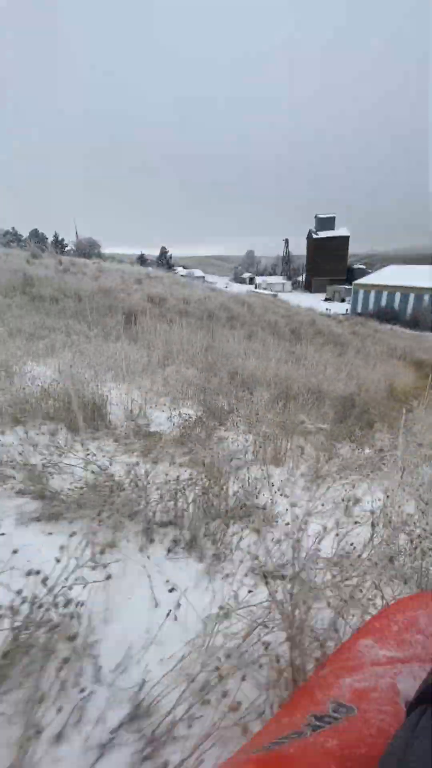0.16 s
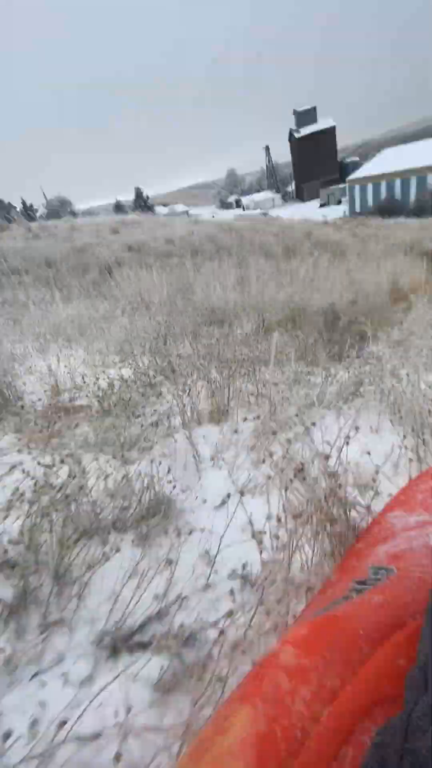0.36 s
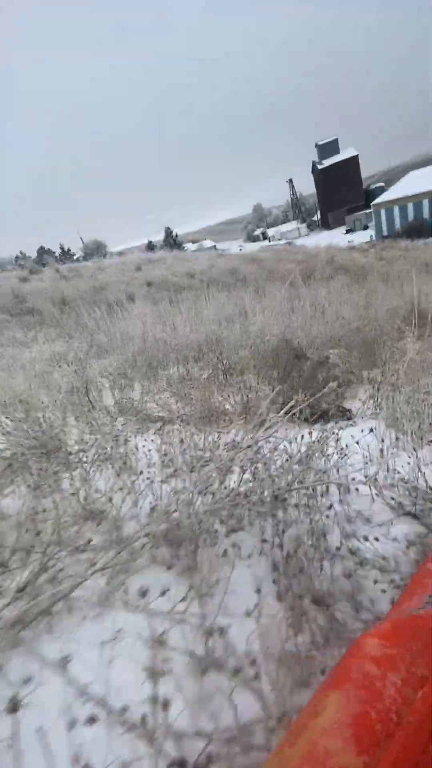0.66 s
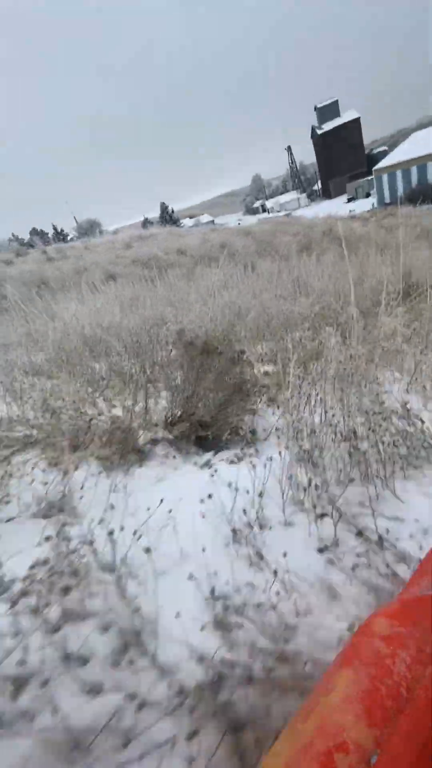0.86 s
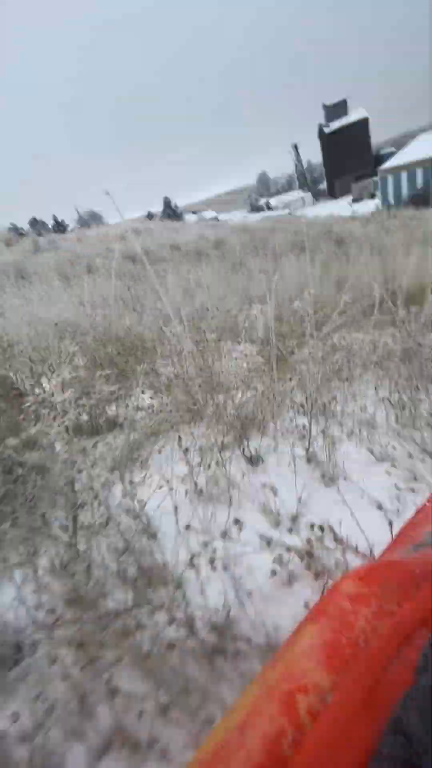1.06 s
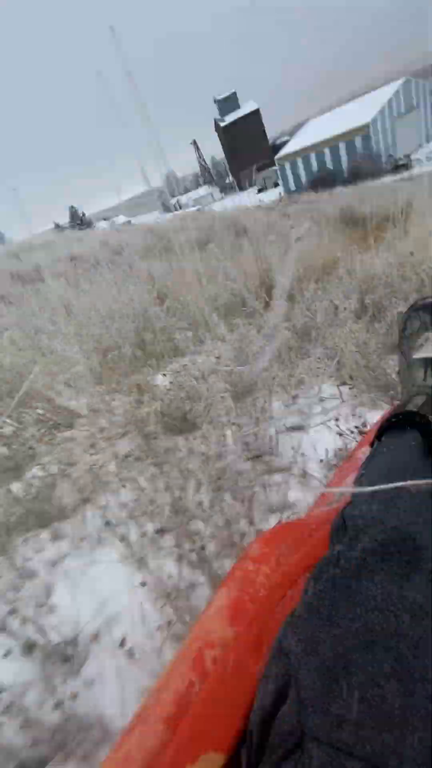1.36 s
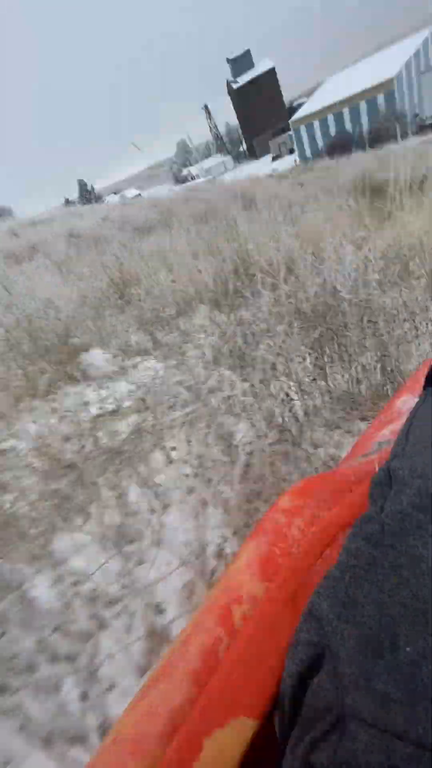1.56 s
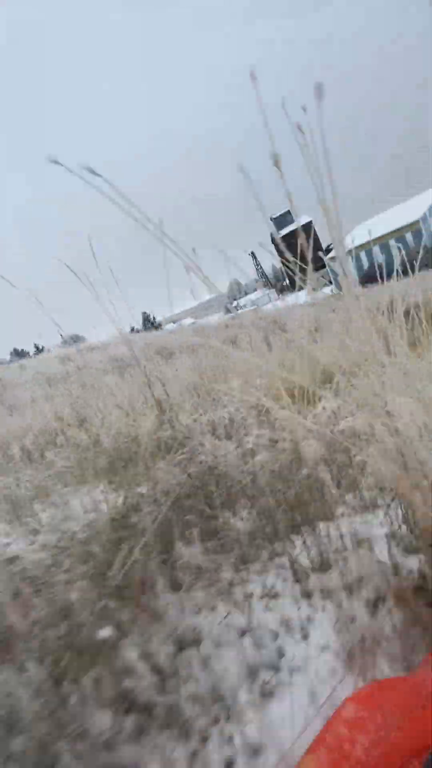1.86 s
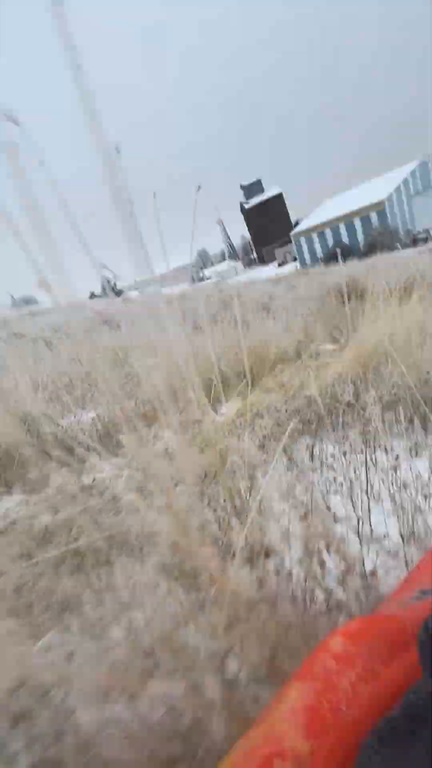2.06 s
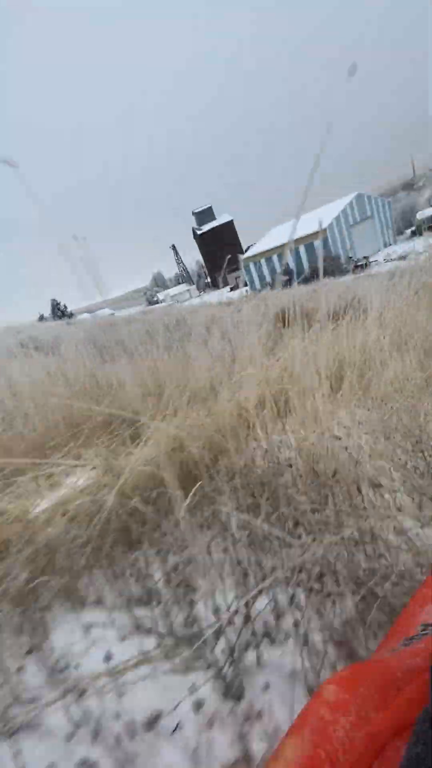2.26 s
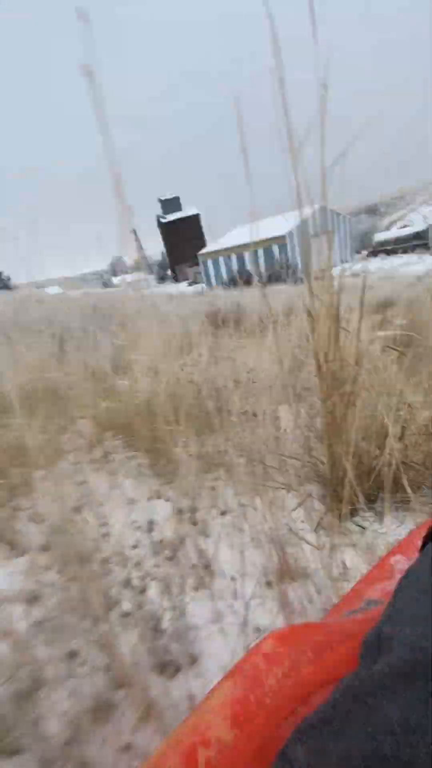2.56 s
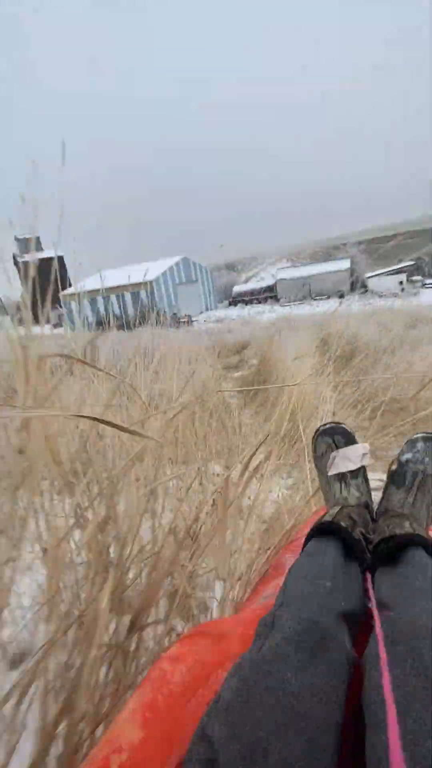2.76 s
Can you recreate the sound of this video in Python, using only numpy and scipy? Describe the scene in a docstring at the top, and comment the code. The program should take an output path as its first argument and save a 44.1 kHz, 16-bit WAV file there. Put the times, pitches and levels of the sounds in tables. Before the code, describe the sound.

From a near-silent instant, a hollow plastic hull bumps into a fast, uneven slide over crusty snow; scraping, rattling and crackling stems continue under rumbling wind, with fewer booms at the end. Close, open-air, on-board microphone.

```python
"""Snow grinds and drums under the hull of a plastic kayak sliding fast down a hillside, heard from on board.
Bursts of random fractures make the crunches on crusty tufts; decaying sines make the boom of each bump.
Ringing shell modes and brief noise bands make the knocks and scrapes; dry grass is filtered grain noise.
Wavering low noise is the wind at two microphone ports, which eases as the boat slows in tall grass near
the end."""
import sys
import numpy as np
from scipy import signal
from scipy.fft import rfft, irfft, next_fast_len
from scipy.io import wavfile

SR = 44100
rng = np.random.default_rng(int(sys.argv[2]) if len(sys.argv) > 2 else 0)


def dump_mix(stems):
    """Bounce the given channels to the path in sys.argv[1] as a 16-bit WAV at rate SR."""
    frames = np.atleast_2d(stems).T  # one column per channel
    limited = np.clip(frames, -1, 1)  # hard clip at full scale
    pcm = np.round(limited * 32767).astype(np.int16)
    wavfile.write(sys.argv[1], SR, pcm)


N = 127890  # samples, 2.9 s
T = np.arange(N) / SR


def amp(db):
    """Logarithmic level: decibels to a pressure ratio."""
    return 10 ** (np.asarray(db) / 20)


def level(curve):
    """Envelope: gain over time, interpolated in decibels between (time [s], level [dB]) points."""
    return amp(np.interp(T, *np.transpose(curve)))


def unit(x):
    """Normalization to an rms of 1."""
    return x / np.sqrt(np.mean(x ** 2) + 1e-20)


def add(mix, start_s, sound):
    """Superposition: mixes a two-channel sound in from its start time."""
    part = mix[:, round(start_s * SR):][:, :sound.shape[1]]
    part += sound[:, :part.shape[1]]


def flutter(rate_hz, depth_db):
    """Random amplitude modulation: a gain that wavers mostly below the given rate, by depth_db rms."""
    hz = np.fft.rfftfreq(N, 1 / SR)
    slow_band = hz / (hz + rate_hz / 10) / (1 + (hz / rate_hz) ** 2)
    slow = irfft(rfft(rng.standard_normal(N)) * slow_band, N)
    return unit(amp(depth_db * unit(slow)))


def grains(per_s, spread_db, smooth):
    """Granular friction: two trains of tiny fractures of uneven size, over a share of smooth rubbing."""
    size = amp(spread_db * np.minimum(rng.exponential(1, N), 4))
    happens = rng.random(N) < per_s / SR  # both trains share their instants
    clicks = size * happens * rng.standard_normal((2, N))
    return unit(unit(clicks) + smooth * rng.standard_normal((2, N)))


def patchy(x, depth_db, width_hz, length_s):
    """Moving excitation: random short-lived resonances, as the point of contact wanders over the shell."""
    frames = dict(nperseg=1024, noverlap=768)
    hz, t, spectrum = signal.stft(x, SR, **frames)
    along_hz = np.fft.fftfreq(len(hz), hz[1])[:, None]
    along_s = np.fft.fftfreq(len(t), t[1])
    blur = np.exp(-(along_hz * width_hz) ** 2 - (along_s * length_s) ** 2)
    noise = rng.standard_normal(spectrum.shape[1:])
    field = unit(np.fft.ifft2(np.fft.fft2(noise) * blur).real)
    return unit(signal.istft(spectrum * amp(depth_db * field), SR, **frames)[1][:, :N])


# phase lead of the left port: (frequency [Hz], lead [-1 to 1])
PORT_LEAD = [(30, 0.47), (100, 1), (170, 0.72), (260, -0.38), (430, -0.71), (700, -1), (1100, 0.36),
             (1900, 0.22), (2600, -0.59), (3700, 0.57), (4650, 0.33), (5400, 0.77), (7000, .3), (12000, 0)]


def ports(drive, colour):
    """Partial coherence: two drives are coloured into the common and opposed parts of two close ports."""
    size = next_fast_len(N + SR // 2)
    log_hz = np.log(np.fft.rfftfreq(size, 1 / SR) + 1)
    hz, common_db, opposed_db = np.transpose(colour)
    common = amp(np.interp(log_hz, np.log(hz), common_db))
    opposed = amp(np.interp(log_hz, np.log(hz), opposed_db))
    lead_hz, lead = np.transpose(PORT_LEAD)
    lead = np.clip(np.interp(log_hz, np.log(lead_hz), lead), -1, 1)
    a, b = rfft(drive, size)
    mid = common * a
    side = opposed * (1j * lead * a + np.sqrt(1 - lead ** 2) * b)  # 1j: a quarter cycle ahead
    both = irfft(np.array([mid + side, mid - side]), size)[:, :N]
    return both / np.sqrt(np.mean(common ** 2 + opposed ** 2))


def pair(z, opposed_db):
    """Phase difference: a complex vibration at two ports, further out of phase for a stronger opposed part."""
    return (z * np.exp(1j * np.arctan(amp(opposed_db)) * np.array([[1], [-1]]))).real


# relative level of the grinding on snow: (time [s], level [dB])
GRIND_LEVEL = [(0, -41), (.095, -38), (.125, -35), (.3, -26), (.365, -34), (.42, -26), (.55, -31),
               (.72, -24.5), (.82, -29.5), (1.0, -25.5), (1.22, -28), (1.37, -25.5), (1.5, -23),
               (1.7, -28.5), (1.81, -33.5), (1.9, -24), (2.04, -30), (2.15, -27), (2.285, -33),
               (2.35, -25.5), (2.6, -26.5), (2.71, -26.5), (2.78, -21), (2.9, -25)]
# spectrum of the grinding: (frequency [Hz], relative common level [dB], relative opposed level [dB])
GRIND_SPECTRUM = [(149, -48, -26), (395, -2, -2), (666, -25.5, -2), (884, -4.5, 5.5), (994, -12.5, 2.5),
                  (1384, -4.5, 3), (1920, -1.5, 3), (2450, -10.5, 0), (3440, -12.5, -1),
                  (4180, -14.5, -14.5), (6800, -34, -18), (12000, -57, -59)]
# relative level of the drumming of the hull: (time [s], level [dB])
DRUM_LEVEL = [(0, -41.5), (.09, -26.5), (.15, -18), (.31, -21), (.37, -40), (.44, -31), (.54, -21),
              (.82, -24.5), (1.08, -26), (1.35, -21.5), (1.4, -28), (1.45, -21.5), (1.8, -23),
              (1.95, -19.5), (2.04, -34), (2.12, -19), (2.29, -34.5), (2.38, -21), (2.5, -32), (2.63, -38),
              (2.77, -28), (2.9, -30.5)]
# spectrum of the hull: (frequency [Hz], relative common level [dB], relative opposed level [dB])
HULL_SPECTRUM = [(50, -68, -28), (113, -8, 0.5), (163, -5, 0), (240, -6, 0.5), (290.7, -1.5, 4),
                 (335, -10.5, -4), (387, -7.5, -5), (438, -8, -18), (520, -23, -14), (630, -32, -4.5),
                 (780, -24, -14), (970, -56, -9.5), (3000, -87, -79)]
GRIND_DB, DRUM_DB = -1.7, -1.5


def sliding():
    """Friction noise: snow grains grind and small lumps drum, both with the wavering contact pressure."""
    pressure = flutter(rate_hz=45, depth_db=0.65)
    snow = patchy(grains(per_s=4000, spread_db=1.0, smooth=0.86), depth_db=4.5, width_hz=76, length_s=0.077)
    lumps = patchy(grains(per_s=500, spread_db=3.5, smooth=0.76), depth_db=2.5, width_hz=220, length_s=0.057)
    grind = ports(snow * pressure * level(GRIND_LEVEL), GRIND_SPECTRUM)
    drum = ports(lumps * pressure * level(DRUM_LEVEL), HULL_SPECTRUM)
    return amp(GRIND_DB) * grind + amp(DRUM_DB) * drum


# crunches on tufts and crust, levels relative: (time of the peak [s], rise [s], fall [s],
# hull knock level [dB], crunch level [dB], stem snap level [dB])
CRUNCH_EVENTS = [ (.122, 0.006, 0.023, -7, -16, -44), (0.12, 0.0018, 0.0037, -20, -33, -18.5),
                 (0.155, 0.0069, 0.0062, -21, -19, -40), (.249, 0.0072, 0.018, -16.5, -16.5, -33),
                 (0.269, .0086, 0.019, -26, -14, -33.5), (0.41, 0.0043, 0.012, -6, -29, -22.5),
                 (0.42, .0027, 0.0094, -13, -31, -29), (0.5, 0.0026, 0.0084, -32, -20, -49),
                 (.656, .0048, 0.006, -25.5, -33, -35), (0.781, 0.015, 0.006, -13, -28, -38),
                 (0.882, .0084, 0.0095, -14.5, -19, -29.5), (1.005, 0.014, 0.026, -9, -20.5, -36),
                 (1.137, 0.0072, 0.016, -12, -22.5, -25.5), (1.243, 0.03, 0.028, -14, -16, -33.5),
                 (1.26, 0.004, 0.01, -12, -15.5, -27.5), (1.280, 0.0087, 0.011, -11, -30, -46),
                 (1.33, 0.0031, 0.01, -10, -26, -47), (1.454, 0.013, 0.012, -20.5, -20, -31),
                 (1.521, .0086, .019, -17, -24, -50), (1.721, 0.0021, .013, -13, -19, -27),
                 (1.747, 0.0013, 0.021, -14, -15, -47), (1.863, 0.026, 0.017, -16, -21, -31.5),
                 (1.887, .008, 0.0092, -11, -14, -36), (1.909, .0016, 0.005, -17.5, -36, -26),
                 (1.998, 0.006, 0.0044, -14, -33, -33), (2.124, 0.0021, 0.011, -11.5, -29, -40),
                 (2.242, 0.0058, 0.0093, -6, -20, -36.5), (2.331, 0.0037, 0.0058, -9, -15, -23),
                 (2.348, 0.0042, 0.013, -11.5, -35, -47), (2.662, .004, .0046, -24, -34, -27),
                 (2.741, 0.01, 0.0064, -16, -21, -45), (2.801, .0039, 0.0078, -21.5, -20, -25)]
# spectrum of breaking crust: (frequency [Hz], relative common level [dB], relative opposed level [dB])
CRUST_SPECTRUM = [(150, -44, -27), (450, -17, 2), (600, -21, 2), (720, -22, -0.5), (860, -16, 7),
                  (960, -37, 6), (1070, -9, -2), (1190, -6.5, 5), (1450, -13, -3), (1600, -13.5, -5),
                  (2000, -12, 0), (2680, -16, -9), (3130, -33, -22), (4460, -45, -33), (7000, -60, -42),
                  (12000, -81, -70)]
# spectrum of snapping stems: (frequency [Hz], relative common level [dB], relative opposed level [dB])
SNAP_SPECTRUM = [(500, -18, -28), (1540, -8, -13), (2550, -1.5, 6), (3740, 3, 11.5), (4300, 1.5, -4),
                 (4500, -2, 0.5), (5920, -0.5, -8), (6260, -19, -5), (7440, -12.5, -8), (9500, -21.5, -49),
                 (12000, -55, -41)]
CRUNCH_DB = 2.5


def crunches():
    """Brittle fracture: each tuft is a burst of fractures; the shell knocks, the crust crunches, stems snap."""
    power = np.zeros((3, N))
    for peak_s, rise_s, fall_s, *parts_db in CRUNCH_EVENTS:
        distance = np.maximum((peak_s - T) / rise_s, (T - peak_s) / fall_s)
        shape = np.exp(-distance.clip(0, 20))
        power += (amp(parts_db)[:, None] * shape) ** 2  # independent bursts add in power
    out = np.zeros((2, N))
    for part, colour in zip(power, (HULL_SPECTRUM, CRUST_SPECTRUM, SNAP_SPECTRUM)):
        breaks = grains(per_s=1500, spread_db=0.5, smooth=0.65)
        fractures = patchy(breaks, depth_db=4.0, width_hz=315, length_s=0.11)
        out += ports(fractures * np.sqrt(part), colour)
    return amp(CRUNCH_DB) * out


# flexing of the hull bottom at each bump: (time [s], relative level [dB], pitch [Hz], decay [s])
BUMP_EVENTS = [ (0.113, -8, 91.9, 0.053), (0.149, -9.5, 77.5, 0.022), (0.401, -8, 57.4, 0.05),
               (0.554, -11, 67, 0.024), (.776, -7, 87.7, 0.017), (0.894, -17, 63, 0.047),
               (1.001, -9, 90, 0.05), (1.081, -12, 53, 0.041), (1.137, -13, 92.8, 0.079),
               (1.281, -7.5, 87, 0.038), (1.34, -2, 67, 0.014), (1.673, -5.5, 54, 0.018),
               (1.728, -1, 103.2, 0.032), (1.847, -9.5, 69.6, 0.064), (1.974, -12.5, 60.3, 0.035),
               (2.056, -4, 71.6, 0.015), (2.132, -10, 86.4, 0.021), (2.248, -6.5, 78, 0.012),
               (2.308, -10, 58.7, 0.019), (2.345, -12, 66, 0.022), (2.676, -18, 69.5, 0.022)]
BOOM_DB, BOOM_RISE_S, BOOM_PORT_LAG_S = 4.5, 0.0066, 0.0036


def booms():
    """Damped oscillation: the hull bottom swings briefly after each bump; the left port hears it first."""
    out = np.zeros((2, N))
    port_lag = np.array([[0], [BOOM_PORT_LAG_S]])
    for start_s, db, hz, decay_s in BUMP_EVENTS:
        t = np.maximum(T - start_s - port_lag, 0)
        shape = (1 - np.exp(-t / BOOM_RISE_S)) * np.exp(-t / decay_s)
        out += amp(db) * shape * np.sin(2 * np.pi * hz * t)
    return amp(BOOM_DB) * out


# hard knocks on the plastic shell: (time [s], relative level [dB],
# pitch factor of the spot that is hit [ratio], opposed over common [dB])
KNOCK_EVENTS = [(0.263, -17, 0.7, 14), (1.26, -15.5, 1.12, 8.5), (1.717, -13.5, 0.98, 4),
                (1.868, -17, 0.84, 15), (2.31, -18, 0.603, 6), (2.738, -18, 0.63, 3)]
# modes of the shell before the pitch factor: (frequency [Hz], relative level [dB], t60 [s])
SHELL_MODES = [(472, -6, 0.097), (578, -8.5, 0.12), (896, -2, 0.034), (1232, -10, 0.13), (1467, 2.5, 0.079),
               (1760, -5.5, 0.035), (2205, -13, 0.14), (2316, -17, 0.014), (2900, -18, 0.069),
               (3920, -10, 0.012)]
CLACK_DB, REBOUND_S, REBOUND_DB = -4.5, 0.004165, 1


def clacks():
    """Modal vibration: a knock and its quick, slightly stronger rebound ring the damped modes of the shell."""
    out = np.zeros((2, N))
    hz, db, t60 = np.transpose(SHELL_MODES)[:, :, None]
    t = np.arange(SR // 8) / SR
    for start_s, hit_db, pitch, opposed_db in KNOCK_EVENTS:
        for delay_s, gain_db in ((0, 0), (REBOUND_S, REBOUND_DB)):
            decay = amp(hit_db + gain_db + db) * np.exp(-np.log(1000) * t / t60)
            cycles = hz * pitch * t + rng.random((len(SHELL_MODES), 1))
            ring = (decay * np.exp(2j * np.pi * cycles)).sum(0)
            add(out, start_s + delay_s, pair(ring, opposed_db))
    return amp(CLACK_DB) * out


def patter(per_s, range_hz, t60_s, spread_db, opposed_db, count):
    """Impulse response: random small blows, each ringing one of several pitches."""
    out = np.zeros((2, N))
    t = np.arange(SR // 8) / SR
    for hz in np.geomspace(*range_hz, count):
        happens = rng.random(N) < per_s / count / SR
        blows = happens * amp(spread_db * rng.uniform(-1.03, 1, N)) * rng.choice([-1, 1], N)
        ring = np.exp((2j * np.pi * hz - np.log(1000) / t60_s) * t) * (1 - np.exp(-hz * t))
        response = pair(ring, opposed_db)[::rng.choice([-1, 1])]  # either port may lead
        out += signal.oaconvolve(blows[None], response, axes=1)[:, :N]
    return unit(out)


RATTLE_DB, RATTLE_PER_S, RATTLE_HZ, RATTLE_T60_S = -7, 70, (312, 618.3), 0.07


def rattle():
    """Random impacts: frozen lumps knock on different panels of the hull, as strongly as it drums."""
    knocks = patter(RATTLE_PER_S, RATTLE_HZ, RATTLE_T60_S, spread_db=6.5, opposed_db=4.0, count=12)
    return amp(RATTLE_DB) * level(DRUM_LEVEL) * knocks


# strength of the added low middle band before an offset is subtracted: (time [s], level [dB])
FULLNESS_LEVEL = [(.1, -7.5), (.55, -11.5), (1.0, 4.5), (1.6, 2.5), (2.75, 3)]
FULLNESS_HZ = 430, 1070


def hollow(x):
    """Band filtering: the sound is hollow at first and fills out in the low middle range both ports share."""
    band_filter = signal.butter(2, FULLNESS_HZ, "band", fs=SR, output="sos")
    band = signal.sosfiltfilt(band_filter, x.mean(0))
    return x + band * (level(FULLNESS_LEVEL) - 1.5)  # a negative gain cancels the band


# hard lumps and stubble scraping the shell: (time [s], relative level [dB], centre [Hz],
# width [octaves], fall [s], opposed over common [dB])
SCRAPE_EVENTS = [ (.110, -12, 1780, 0.59, 0.0044, 5.5), (.118, -18.5, 700, 1.3, 0.008, 21),
                 (.408, -22, 3700, 0.17, 0.0057, 1), (.96, -10.5, 1700, 1.4, .008, 11),
                 (1.006, -10.5, 348, 0.68, 0.014, 1.5), (1.717, -16, 1610, 1, 0.011, 7),
                 (1.72, -10.5, 700, 0.86, 0.018, 15), (1.746, -14.5, 990, 1.5, 0.011, 5.5),
                 (2.24, -17, 920, 1.2, 0.0053, -2)]
SCRAPE_DB, SCRAPE_RISE_S = -0.5, 0.00063


def scrapes():
    """Transient band noise: each scrape starts at once and dies quickly; the size of what is struck sets its band."""
    out = np.zeros((2, N))
    t = np.arange(SR // 8) / SR
    for start_s, db, hz, octaves, fall_s, opposed_db in SCRAPE_EVENTS:
        edges = np.clip(hz * 2 ** (np.array([-.5, .5]) * octaves), 50, SR / 3)
        band_filter = signal.butter(2, edges, "band", fs=SR, output="sos")
        grit = signal.hilbert(signal.sosfilt(band_filter, rng.standard_normal(len(t))))
        shape = (1 - np.exp(-t / SCRAPE_RISE_S)) * np.exp(-t / fall_s)
        # every burst carries the energy of its envelope
        burst = grit * shape * np.linalg.norm(shape) / np.linalg.norm(grit.real * shape)
        add(out, start_s, amp(db) * pair(burst, opposed_db))
    return amp(SCRAPE_DB) * out


# relative level of the swish of grass: (time [s], level [dB])
SWISH_LEVEL = [(0, -53.5), (.098, -49), (.125, -39.5), (.26, -43.5), (.37, -43.5), (.45, -38), (.56, -44),
               (.7, -39.5), (.82, -46), (.86, -35.5), (1.0, -36.5), (1.1, -40), (1.185, -42.5),
               (1.25, -33.5), (1.34, -43.5), (1.48, -37), (1.81, -46), (1.87, -37.5), (2.0, -42.5),
               (2.12, -40), (2.29, -45.5), (2.34, -34), (2.44, -39), (2.65, -34.5), (2.7, -42), (2.78, -31),
               (2.9, -40)]
# spectrum of the swish: (frequency [Hz], relative common level [dB], relative opposed level [dB])
SWISH_SPECTRUM = [(500, -51, -27), (1480, -17, -4), (2330, 3.5, -8), (2970, 1, -3), (3570, -3, -3),
                  (4060, 1.5, 8.5), (4360, -7, -7), (5270, 7, 4.5), (6100, 1, 2.5), (6720, -8.5, 2),
                  (7550, -2.5, 3.5), (8800, -9.5, -10), (10100, -14, -27), (10860, -20, -29),
                  (11600, -25, -23)]
SWISH_DB = 3


def grass():
    """Brushing friction: dry stems brush and tick along the sides."""
    stems = grains(per_s=5000, spread_db=2.0, smooth=2.6) * flutter(rate_hz=29, depth_db=0.9)
    return amp(SWISH_DB) * ports(stems * level(SWISH_LEVEL), SWISH_SPECTRUM)


CRACKLE_DB, CRACKLE_PER_S, CRACKLE_HZ, CRACKLE_T60_S = -2, 220, (1490, 5930), .005


def crackle():
    """Random impulses: single dry stems crack among those that brush past."""
    cracks = patter(CRACKLE_PER_S, CRACKLE_HZ, CRACKLE_T60_S, spread_db=7.5, opposed_db=5.5, count=14)
    return amp(CRACKLE_DB) * level(SWISH_LEVEL) * cracks


# relative level of the wind on the microphone: (time [s], level [dB])
WIND_LEVEL = [(0, -15.5), (.05, -31.5), (.1, -23.5), (.15, -18), (.3, -24), (.38, -33), (.43, -28.5),
              (.72, -19.5), (.95, -24), (1.25, -15.5), (1.41, -21.5), (1.68, -16), (1.81, -19),
              (1.9, -18.5), (2.0, -19.5), (2.045, -23), (2.1, -22), (2.25, -13), (2.29, -19), (2.33, -13),
              (2.43, -23.5), (2.5, -35), (2.63, -44.5), (2.72, -27.5), (2.9, -40)]
# spectrum of the wind: (frequency [Hz], relative common level [dB], relative opposed level [dB])
WIND_SPECTRUM = [(15, -38, -40), (29.4, -15, -28), (44.6, -7, -28), (57, -1, -8), (101, -5.5, -7.5),
                 (147.7, -12.5, -13), (244, -24, -38), (403, -43, -23), (896, -41, -58), (3970, -100, -100)]
WIND_DB = 2.5


def wind():
    """Turbulent pressure: lumpy low-frequency noise at the ports."""
    gusts = rng.standard_normal((2, N)) * flutter(rate_hz=43, depth_db=4.0)
    return amp(WIND_DB) * ports(gusts * level(WIND_LEVEL), WIND_SPECTRUM)


LEFT_DB = 0.28  # gain on the left, loss on the right


def scene():
    """Superposition at the microphone on board; booms, grass and wind are slightly stronger on the left."""
    hull = hollow(sliding() + crunches() + clacks() + rattle()) + scrapes()
    surroundings = booms() + grass() + crackle() + wind()
    return hull + surroundings * amp([[LEFT_DB], [-LEFT_DB]])


EDGE_HZ = 12100


def record(dry):
    """Saturation and low-pass filtering: soft overload on the loudest peaks, then the band limit."""
    ceiling = .93
    held = dry / (1 + (dry / ceiling) ** 6) ** (1 / 6)
    low_pass = signal.firwin(511, EDGE_HZ, window=("kaiser", 9), fs=SR)
    return signal.oaconvolve(held, low_pass[None], "same")


dry = scene()
out = record(dry)
dump_mix(out)
```